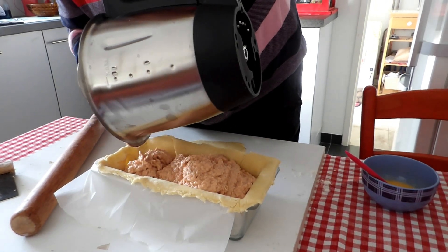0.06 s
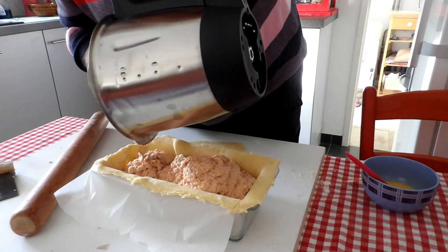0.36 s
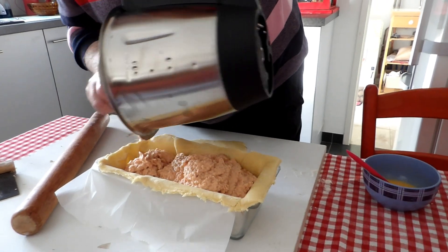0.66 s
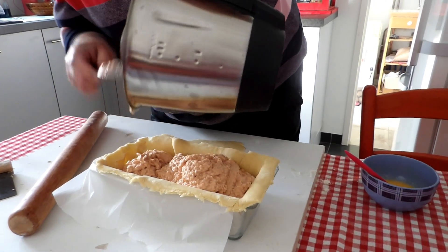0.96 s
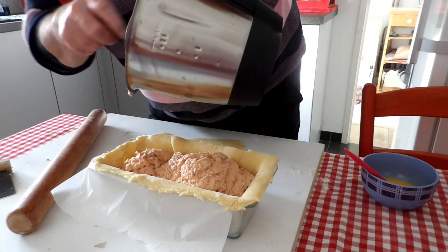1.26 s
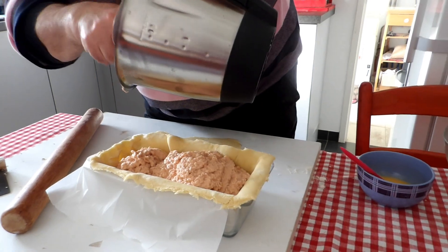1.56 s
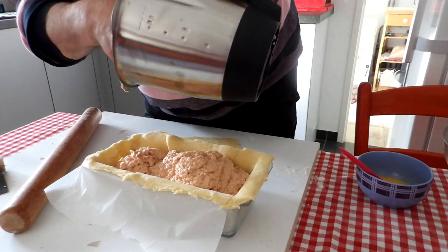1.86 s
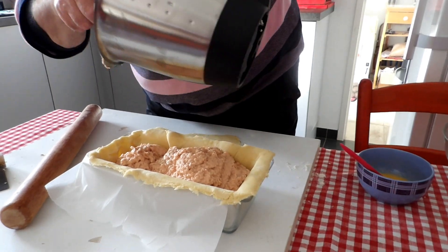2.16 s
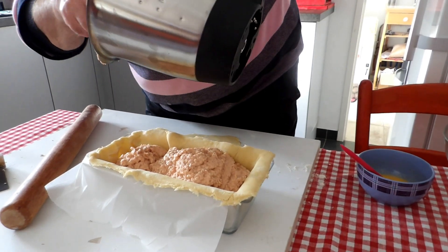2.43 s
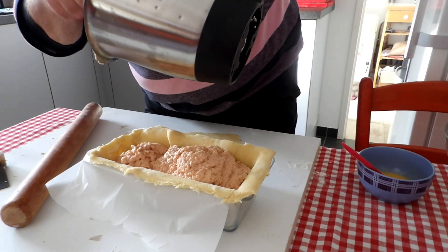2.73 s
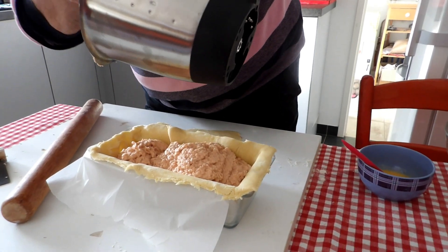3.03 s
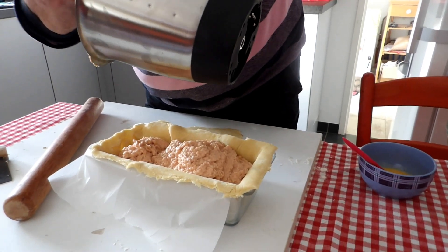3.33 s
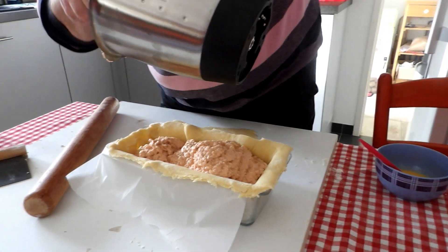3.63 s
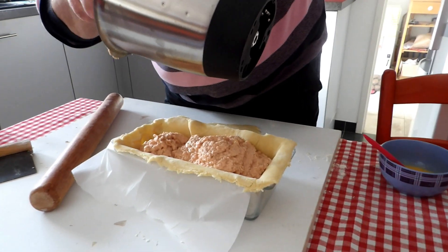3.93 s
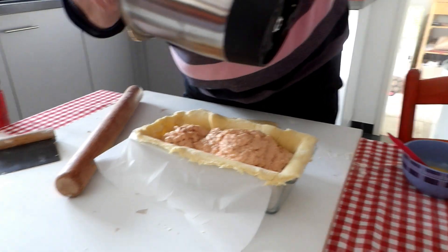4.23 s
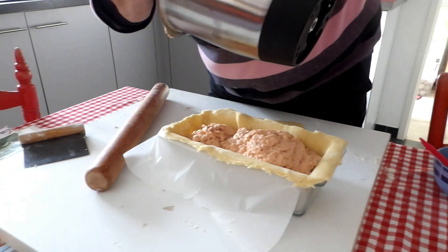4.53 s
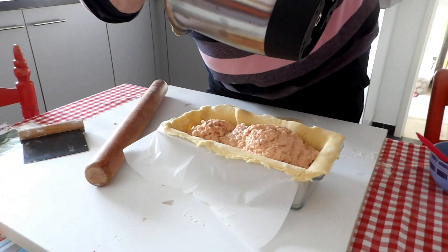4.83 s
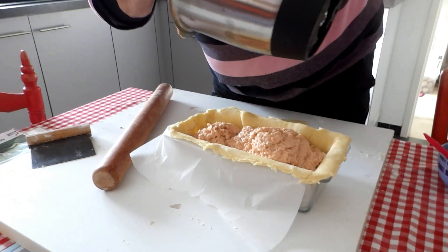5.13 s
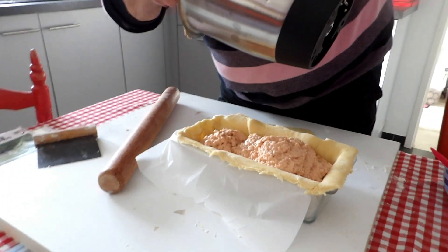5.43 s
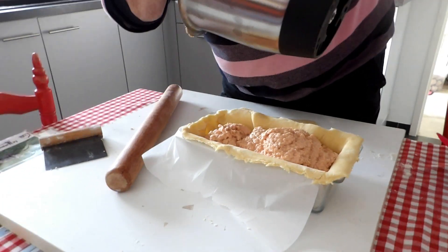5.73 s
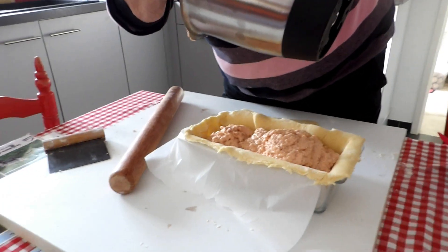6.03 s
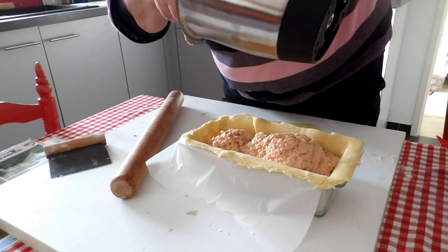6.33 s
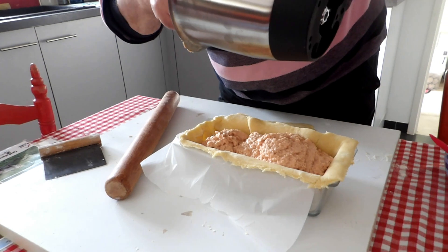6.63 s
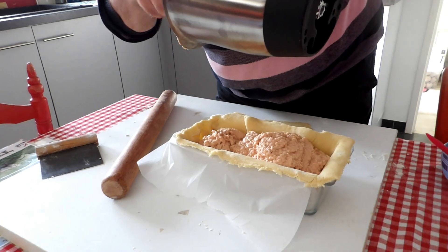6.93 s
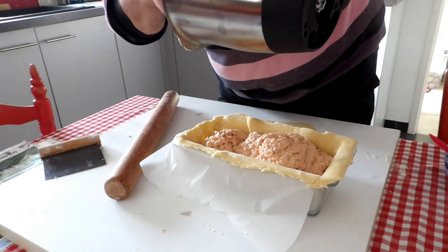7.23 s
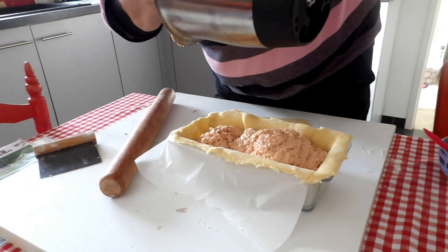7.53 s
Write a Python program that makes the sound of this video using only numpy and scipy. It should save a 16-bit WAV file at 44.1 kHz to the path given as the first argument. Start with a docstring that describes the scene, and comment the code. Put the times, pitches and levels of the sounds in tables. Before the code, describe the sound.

A spoon knocks against the inside of a coated steel jug and drags along its wall, squeaking as the edge sticks and slips. A few thin rim notes ring near the start. The tapping and scraping continue in irregular bursts with short pauses, until a high squeak and two small pops from the mixture lead to loud closing knocks. A short kitchen reverberation follows each contact.

```python
"""A spoon scrapes thick mixture out of a stainless steel jug in a small, hard kitchen.
It opens with knocks and short drags that squeal as the edge sticks and slips; the bare rim rings twice.
A faint long drag at 1 s leads to a third rim note and runs of knocks and gliding strokes up to 5.5 s.
A thin high squeal follows at 5.8 s, two air pockets pop at 6.7 s, and loud knocks and last strokes end it.
Throughout, the coated steel colours the contacts and the room carries them on over a low noise floor."""
import sys
import numpy as np
from scipy import signal
from scipy.fft import rfft, irfft
from scipy.io import wavfile

SR = 44100
rng = np.random.default_rng(int(sys.argv[2]) if len(sys.argv) > 2 else 0)


def output_pcm(signal):
    """Save a mono or channel-first signal as 16-bit PCM at the path in sys.argv[1].

    Samples are clipped to [-1, 1] before scaling.
    """
    pcm = np.clip(np.atleast_2d(signal).T, -1, 1) * 32767
    wavfile.write(sys.argv[1], SR, np.round(pcm).astype(np.int16))


N = 343098
TIME = np.arange(N) / SR


def from_db(db):
    return 10 ** (np.asarray(db) / 20)


def unit_rms(x):
    return x / np.sqrt(np.mean(x ** 2) + 1e-20)


def at_hz(points, hz):
    """Read (f/Hz, value) points on a log frequency axis."""
    point_hz, values = np.transpose(points)
    return np.interp(np.log(np.maximum(hz, 1)), np.log(point_hz), values)


def band(x, low_hz, high_hz):
    return signal.sosfilt(signal.butter(3, [low_hz, high_hz], "band", fs=SR, output="sos"), x + 1e-18)


def resonate(x, hz, width_hz):
    """Band-pass resonance, peak gain 1."""
    return signal.lfilter(*signal.iirpeak(hz, hz / width_hz, fs=SR), x + 1e-18)


def ping(start_s, hz, t60_s):
    """Decaying unit sine, struck at start_s."""
    r, w = from_db(-60 / (t60_s * SR)), 2 * np.pi * hz / SR
    click = signal.unit_impulse(N, round(start_s * SR))
    return signal.lfilter([0, np.sin(w)], [1, -2 * r * np.cos(w), r * r], click + 1e-18)


def drift(knots_per_s):
    """Straight lines between random unit-normal knots."""
    knots = rng.standard_normal(20000)
    return np.interp(TIME * knots_per_s, np.arange(len(knots)), knots)


# Contact bands (rows: cavity, body, clang, bite, sizzle): low f/Hz, high f/Hz, knock/dB, scrape/dB
CONTACT_BANDS = [(257, 557, -16, -27), (699, 1016, -6, -18.5), (1240, 2513, -2.5, -4.5),
                 (2500, 5310, -0.5, -5.5), (6630, 12100, -8.5, -8)]
# Spoon hits steel: t/s, level/dB, relative cavity/dB, body/dB, bite/dB, sizzle/dB, spot f/Hz
KNOCKS = [(0.0244, -20, -5, -0.5, 1, -4.5, 1440), (0.165, -29.5, -14, -10, 2, -7, 3120),
          (0.177, -28, -36, -15, -21, -19, 2250), (0.4754, -21, -4, 2, 0, 0.5, 4260),
          (0.649, -23, -42, -12, -2, -4.5, 2206), (1.3541, -25, -5, -4.5, -1.5, -3, 3050),
          (1.421, -16.5, -8.5, -14, -8.5, -13, 1320), (1.535, -21.5, -6.5, -28, 0, -3.5, 1620),
          (1.773, -33.5, 2, -2, 0.5, -5, 2030), (1.882, -32.5, -1.5, 2.5, -3, -13, 1400),
          (2.0924, -41.5, -7, -8, 2.5, 6, 2760), (2.1619, -32, -8.5, -18, -5, -4, 1422),
          (2.272, -47.5, 12, -17, 1, 4.5, 2790), (2.318, -30.5, 3.5, -4.5, 5, 4.5, 2907),
          (2.389, -21, -6.5, -23, -9.5, -19, 1474), (2.5085, -20, -5, -14, -4.5, -8, 1492),
          (2.678, -44.5, -1.5, -11, -4, 4, 4060), (2.8803, -33.5, -3, -16, 0, -2, 2370),
          (2.9989, -30, 4.5, -10, -2.5, -9, 2877), (3.408, -67, 0, -4, -11, 9, 2316),
          (3.503, -32.5, 3.5, -6, 2, 0, 2897), (3.875, -30, 3.5, -6.5, 0.5, 3, 1650),
          (3.9764, -38.5, -7, -6.5, -3.5, 4, 1407), (4.632, -20, -6, -15.5, -1.5, -10, 2497),
          (4.8245, -24, -9, -13, -7.5, -17, 2500), (4.889, -26.5, -24, -6, -4, -1, 2130),
          (5.098, -29.5, -2.5, -9, 1.5, 3, 1517), (5.199, -47, 1, -12, -7, 7.5, 1690),
          (5.4399, -37.5, -9.5, -10, -1.5, 0.5, 2800), (5.8203, -32.5, -3, -2.5, 7, 10, 3130),
          (6.4535, -42.5, 1.5, -7.5, -3, -15, 1560), (6.6198, -37, -1.5, -8, -4, -20, 1670),
          (6.7034, -43, -8, -9, -1.5, -6, 1750), (6.942, -40, -13, -9, -2, 3, 2800),
          (7.042, -28, -10.5, -30, -7, -15, 2393), (7.0606, -21.5, -17.5, -17, -5.5, -14, 2465),
          (7.1619, -20, -33, -35, -10.5, -13, 1420), (7.192, -19.5, -10, -7.5, -3.5, -8, 1538),
          (7.3925, -42.5, 3.5, -7, -8, -1.5, 1520), (7.4714, -24, -7, -6, -5, -4.5, 3040)]


def knocks(rise_s=0.0022, chatter_s=0.0032, span_s=0.0095, grain_db=2.0, spot_db=-5.0, spot_width_hz=75):
    """The spoon lands, cushioned by the mixture, and chatters; each spot has its own short note."""
    size = 4000
    out, t = np.zeros(N + size), TIME[:size]
    contact = np.minimum((t + 1 / SR) / rise_s, 1) * np.exp(-np.maximum(t - rise_s, 0) / chatter_s)
    span_gain = np.sqrt(span_s * SR / size)  # refers the level to span_s
    for start_s, level_db, cavity_db, body_db, bite_db, sizzle_db, spot_hz in KNOCKS:
        grain = from_db(grain_db * np.repeat(rng.standard_normal(size // 20), 20))
        force = contact * grain * rng.standard_normal(size)
        clank = signal.fftconvolve(force, wall_response(size))[:size]
        blow = from_db(spot_db) * unit_rms(resonate(force, spot_hz, spot_width_hz))
        colours_db = (cavity_db, body_db, 0, bite_db, sizzle_db)
        for (low_hz, high_hz, trim_db, _), colour_db in zip(CONTACT_BANDS, colours_db):
            blow += from_db(trim_db + colour_db) * unit_rms(band(clank, low_hz, high_hz))
        at = round(start_s * SR)
        out[at:at + size] += from_db(level_db) * span_gain * blow
    return out[:N]


def wall_response(size, low_hz=1150, high_hz=5600, count=48, t60_s=0.0073, click=1.75):
    """A click, then the wall's overtones; clinging mixture shifts them from blow to blow."""
    t = TIME[:size]
    mode_hz = rng.uniform(low_hz, high_hz, count)
    sines = np.sin(2 * np.pi * mode_hz[:, None] * t)
    modes = rng.standard_normal(count) @ sines * from_db(-60 * t / t60_s)
    return modes / np.sqrt(np.sum(modes ** 2)) + click * signal.unit_impulse(size)


# Spoon drags on the wall: start t/s, end t/s, start level/dB, end level/dB, relative bite/dB, sizzle/dB,
# squeal start f/Hz, end f/Hz, relative squeal/dB
STROKES = [(0.074, 0.142, -38, -32.5, 4.5, -6, 1720, 1750, 2.5),
           (0.162, 0.18, -38.5, -33.5, 7, 3, 2380, 2940, 4),
           (0.50, 0.634, -40.5, -37.5, 7, 1, 1357, 1350, 5.5),
           (0.644, 0.658, -25.5, -37, 11, -1, 1370, 1386, 10.5),
           (0.93, 1.259, -63.5, -62.5, -4, -8, 1392, 1400, -15),
           (1.37, 1.527, -34, -38, 3.5, -3, 2980, 2560, -2.5),
           (1.56, 1.621, -33.5, -43, -4, -18, 1600, 1600, -3),
           (1.655, 1.899, -37, -33, -6, -16.5, 1536, 1356, -5),
           (1.949, 1.984, -48, -41.5, -8, -11, 1414, 1380, -0.5),
           (2.281, 2.375, -45.5, -43, 3, -8, 2855, 2846, -6),
           (2.415, 2.539, -39, -37, 3, -8, 1455, 1625, 3), (2.691, 2.77, -47, -53, 1, -2.5, 1464, 1380, -7),
           (2.911, 2.996, -51, -47.5, 4, -22, 2630, 2700, -6),
           (3.056, 3.088, -30.5, -26, -4, -17.5, 1474, 1620, -9.5),
           (3.545, 3.638, -49.5, -53.5, 2.5, -5.5, 1835, 1558, 2),
           (4.13, 4.198, -56.5, -44.5, -1.5, -9.5, 2860, 2916, 0),
           (4.655, 4.674, -34.5, -44, 1, -9, 2455, 2540, 11.5),
           (4.725, 4.815, -33.5, -42, -3.5, -25, 1898, 2144, -1),
           (4.835, 4.902, -36.5, -33.5, -0.5, -15, 1983, 2130, 3.5),
           (4.925, 5.02, -43, -42.5, -10, -16, 2130, 2650, -4),
           (5.047, 5.092, -34.5, -30.5, 2, -9, 1755, 2110, 1),
           (5.122, 5.212, -41.5, -45.5, 0.5, -8, 1750, 1600, -2),
           (5.305, 5.317, -38.5, -38, 2.5, -9.5, 2650, 2900, -3),
           (5.732, 5.817, -58.5, -60, 18.5, 15, 4050, 4470, 19),
           (5.833, 5.89, -45, -51.5, 9.5, 7, 3530, 3740, 4),
           (6.50, 6.531, -60, -53, -8, -22, 1473, 1416, -5),
           (6.603, 6.70, -46.5, -51, -11, -20, 1650, 1690, -16),
           (6.971, 7.032, -60, -59, 0, -10, 1870, 1870, 6),
           (7.087, 7.155, -54, -29.5, -8, -21, 1630, 1720, -6),
           (7.171, 7.34, -31, -57.5, -4, -9, 1760, 1494, 6.5),
           (7.537, 7.609, -51, -41, 3.5, -1, 2890, 3510, -4)]


def scrapes(grain_db=-0.5, judder_db=2.5, squeal_trim_db=-4.0, waver=0.06):
    """Friction is a dense run of tiny slips; some fall into step and squeal."""
    pressure, bite_db, sizzle_db, squeal_hz, squeal_db = stroke_controls()
    roughness = from_db(grain_db * drift(1500) + judder_db * drift(87))
    grip = unit_rms(roughness * (1 + catches()))
    slip_hz = squeal_hz * (1 + waver * drift(700))
    squeal = np.sin(2 * np.pi * np.cumsum(slip_hz) / SR)
    out = from_db(squeal_trim_db + squeal_db) * unit_rms(squeal * grip)
    for (low_hz, high_hz, _, trim_db), colour_db in zip(CONTACT_BANDS, (0, 0, 0, bite_db, sizzle_db)):
        rasp = band(grip * rng.standard_normal(N), low_hz, high_hz)
        out += from_db(trim_db + colour_db) * unit_rms(rasp)
    return pressure * out


def stroke_controls(attack_s=0.012, release_s=0.011, bite_rise_db=3.5, sizzle_rise_db=2.5):
    """Pressure and squeal glide over a stroke; it brightens as the edge wipes the steel bare."""
    start_s, end_s, first_db, last_db, bite_db, sizzle_db, first_hz, last_hz, squeal_db = zip(*STROKES)

    def glide(first, last):
        return np.interp(TIME, np.ravel([start_s, end_s], "F"), np.ravel([first, last], "F"))

    def rise(middle_db, rise_db):
        return glide(np.subtract(middle_db, rise_db / 2), np.add(middle_db, rise_db / 2))

    touching = sum(np.interp(TIME, [on - attack_s, on, off, off + release_s], [0, 1, 1, 0])
                   for on, off in zip(start_s, end_s))
    pressure = np.minimum(touching, 1) * from_db(glide(first_db, last_db))
    return (pressure, rise(bite_db, bite_rise_db), rise(sizzle_db, sizzle_rise_db),
            glide(first_hz, last_hz), glide(squeal_db, squeal_db))


def catches(per_s=45, height=0.74, t60_s=0.015):
    """The spoon's edge catches at random and lets go with a small snap."""
    snaps = (rng.random(N) < per_s / SR) * height * rng.uniform(0.11, 1, N)
    return signal.lfilter([1], [1, -from_db(-60 / (t60_s * SR))], snaps + 1e-18)


# Cavity and wall resonances: f/Hz, width/Hz, lift/dB
JUG_MODES = [(308.3, 7.3, 8), (461, 28.5, 7.5), (491.7, 19.3, 17), (723, 8.9, -5), (1114, 25, 4),
             (1320, 7.7, -3), (1390, 9, 3), (1470, 96, 3), (1810, 190, 2), (1858, 17, 5.5), (2160, 160, 2),
             (2650, 42, 2), (2890, 360, 4), (3660, 350, 5), (3610, 42, -2.5), (4660, 19, -2),
             (5150, 450, -2.5), (9160, 800, 5), (10610, 760, 6.5)]


def jug(force, lowest_hz=120):
    """The steel, damped by the mixture, colours each contact; it is too small to radiate bass."""
    out = signal.sosfilt(signal.butter(3, lowest_hz, "high", fs=SR, output="sos"), force + 1e-18)
    for hz, width_hz, lift_db in JUG_MODES:
        out += (from_db(lift_db) - 1) * resonate(out, hz, width_hz)
    return out


# Spoon catches the rim: t/s, f/Hz, level/dB
RIM_STRIKES = [(0.177, 1390, -38), (0.648, 1363, -35), (1.422, 1328, -34.5)]


def rim_rings(t60_s=0.38):
    """Bare of mixture, the rim holds one thin note."""
    return sum(from_db(level_db) * ping(start_s, hz, t60_s) for start_s, hz, level_db in RIM_STRIKES)


# Air pockets in the mixture: t/s, f/Hz, level/dB
PLOPS = [(6.728, 743, -39), (6.736, 495, -43)]


def plops(t60_s=0.052):
    """Each air pocket rings briefly as it opens."""
    return sum(from_db(level_db) * ping(start_s, hz, t60_s) for start_s, hz, level_db in PLOPS)


# Direct sound, left over right: f/Hz, level/dB
BALANCE_DB = [(300, 1.5), (1300, 0), (2400, -1), (4400, -2.5), (8100, -9.5), (13000, -1.5)]
# Direct sound, left ahead of right: f/Hz, phase/rad
LEAD_RAD = [(500, 0), (1500, 0.2), (2500, 0.28), (4600, -1.0), (6500, 0.2), (10000, 1.5), (13000, 0.5),
            (15000, 2.5)]


def direct_sound(x):
    """The straight path reaches the two microphones at unequal level and phase."""
    hz = np.arange(N // 2 + 1) * SR / N
    half = np.array([[.5], [-.5]])
    response = from_db(at_hz(BALANCE_DB, hz) * half) * np.exp(1j * at_hz(LEAD_RAD, hz) * half)
    return irfft(rfft(x) * response, N)


# Room decay: f/Hz, T60/s
ROOM_T60_S = [(200, 0.35), (530, 0.44), (1400, 0.43), (3700, 0.45), (9700, 0.39), (15000, .25)]
# Room over direct sound: f/Hz, level/dB
ROOM_DB = [(300, -1), (1400, 1), (3700, 1.5), (10000, 4)]


def kitchen_reverb(x, gap_s=0.0014, early_db=8.0, early_t60_s=0.053):
    """Quick reflections off table and cupboards, then a tail that dies band by band."""
    size = 32768
    t, hz = TIME[:size], np.arange(size // 2 + 1) * SR / size
    spectrum = rfft(diffuse_noise(size, ROOM_DB))
    onset = np.clip(t / gap_s - 1, 0, 1)
    early = from_db(early_db - 60 * t / early_t60_s)
    response = np.zeros((2, size))
    for band_hz, t60_s in ROOM_T60_S:
        share = at_hz([(f, f == band_hz) for f, _ in ROOM_T60_S], hz)
        decay = (from_db(-60 * t / t60_s) + early) * onset
        response += irfft(spectrum * share, size) * decay / np.sqrt(np.sum(decay ** 2))
    return signal.fftconvolve(x[None], response, axes=1)[:, :N]


# Diffuse field at the microphones: f/Hz, left-right correlation
CORRELATION = [(60, .8), (130, 0.55), (400, 0.76), (1400, 0.78), (3000, 0.63), (5000, 0.46), (8000, -0.062),
               (14000, -0.34)]


def diffuse_noise(size, spectrum_db):
    """Stereo noise from all sides: alike in bass and mids, largely unrelated in the treble."""
    hz = np.arange(size // 2 + 1) * SR / size
    mid, side = rfft(rng.standard_normal((2, size)))
    alike = at_hz(CORRELATION, hz)
    pair = np.sqrt((1 + alike) / 2) * mid + np.sqrt((1 - alike) / 2) * side * [[1], [-1]]
    return irfft(pair * from_db(at_hz(spectrum_db, hz)), size)


# Still-room noise density: f/Hz, relative level/dB
ROOM_TONE_DB = [(20, -10.5), (45, -17), (68, -3), (100, -7.5), (200, -3.5), (300, -1.5), (380, -9.5),
                (490, 0.5), (650, -6.5), (1800, -10.5), (4500, -18), (7000, -25.5), (10500, -21),
                (15500, -34.5)]


def room_tone(level_db=-57.5):
    """Faint, steady noise of the still room."""
    return from_db(level_db) * unit_rms(diffuse_noise(N, ROOM_TONE_DB))


def scene():
    """Jug, rim and air pockets sound in the kitchen, over its room tone."""
    background = room_tone()
    sources = jug(knocks() + scrapes()) + rim_rings() + plops()
    return direct_sound(sources) + kitchen_reverb(sources) + background


def record(dry, notch_hz=11750, notch_width_hz=500, cutoff_hz=15800):
    """The microphone has a narrow treble dip; the top is cut."""
    notched = signal.lfilter(*signal.iirnotch(notch_hz, notch_hz / notch_width_hz, fs=SR), dry)
    return signal.sosfilt(signal.ellip(10, .1, 80, cutoff_hz, fs=SR, output="sos"), notched)


dry = scene()
out = record(dry)
output_pcm(out)
```